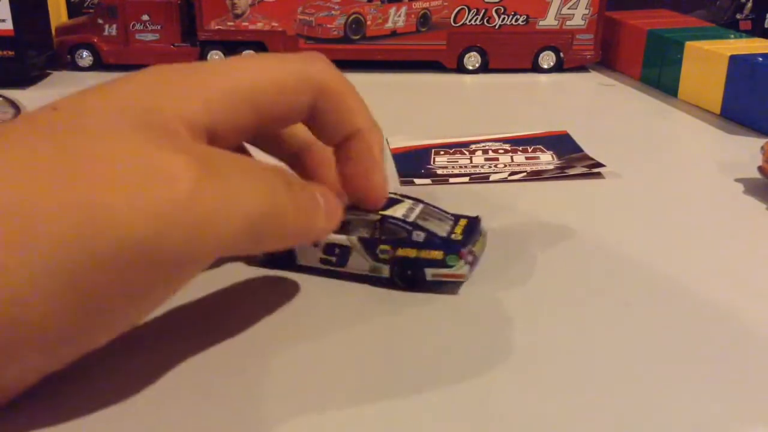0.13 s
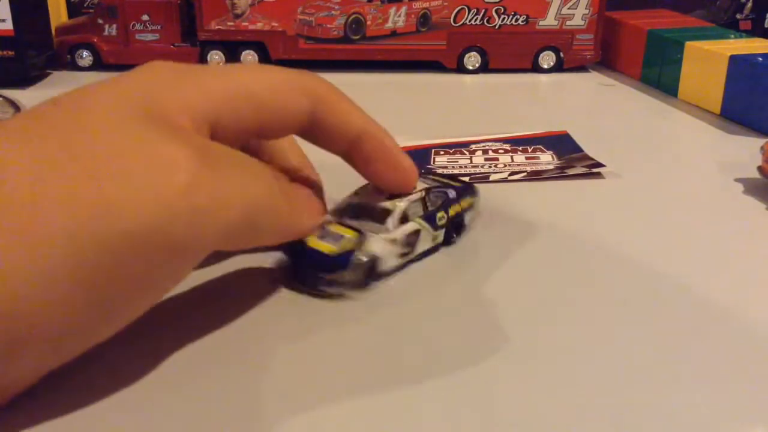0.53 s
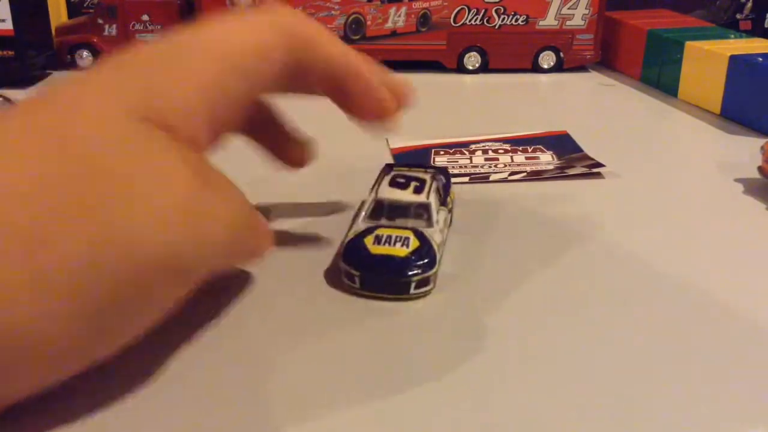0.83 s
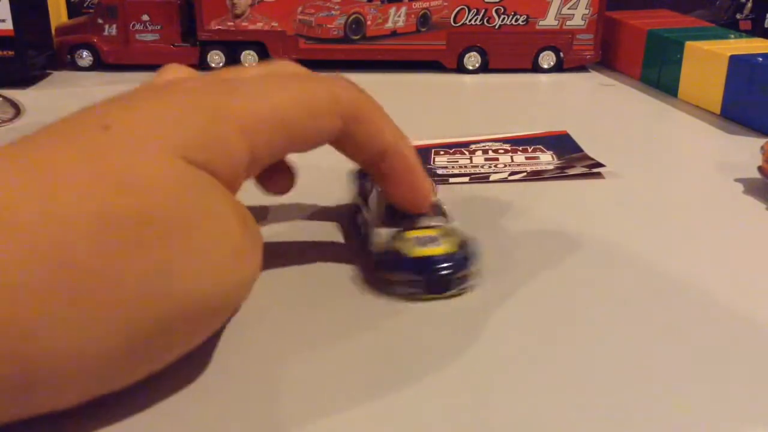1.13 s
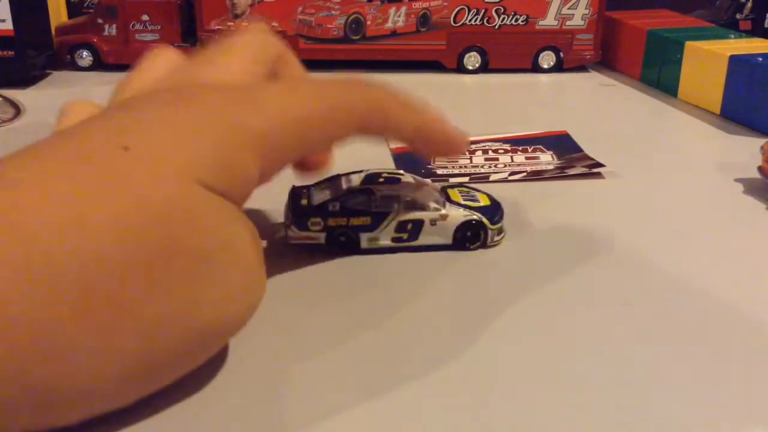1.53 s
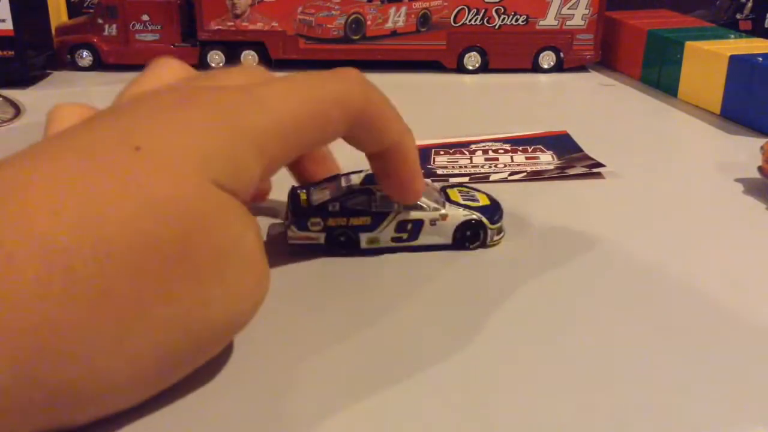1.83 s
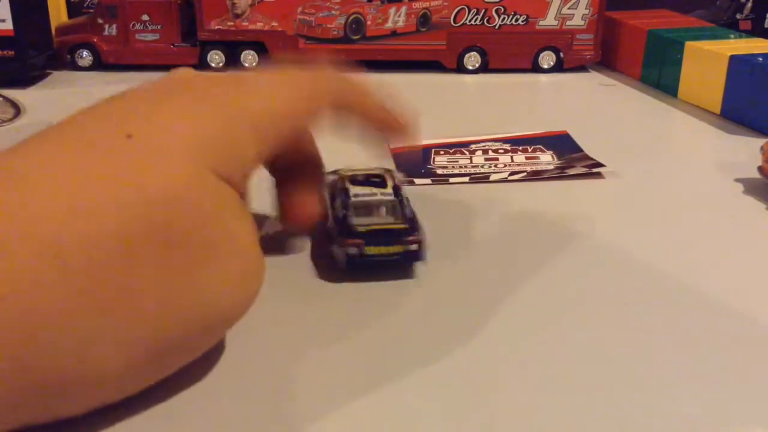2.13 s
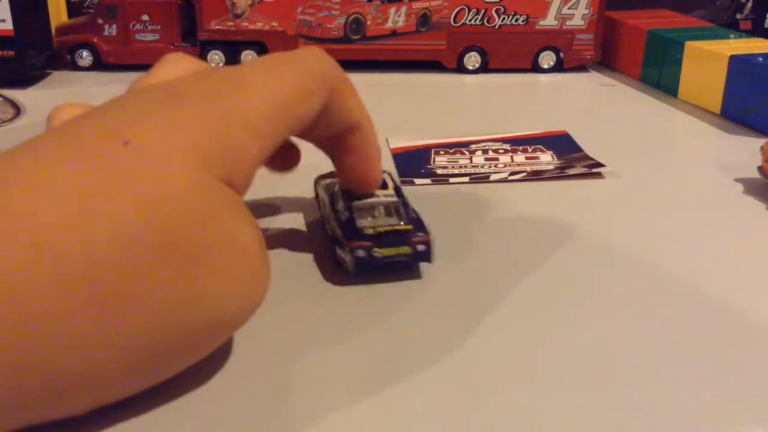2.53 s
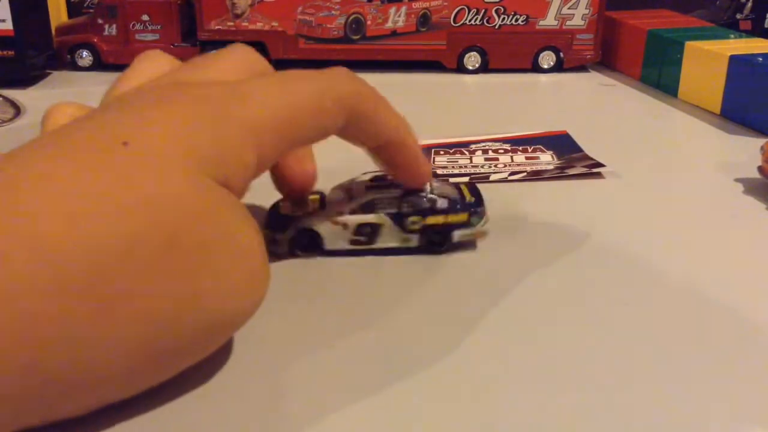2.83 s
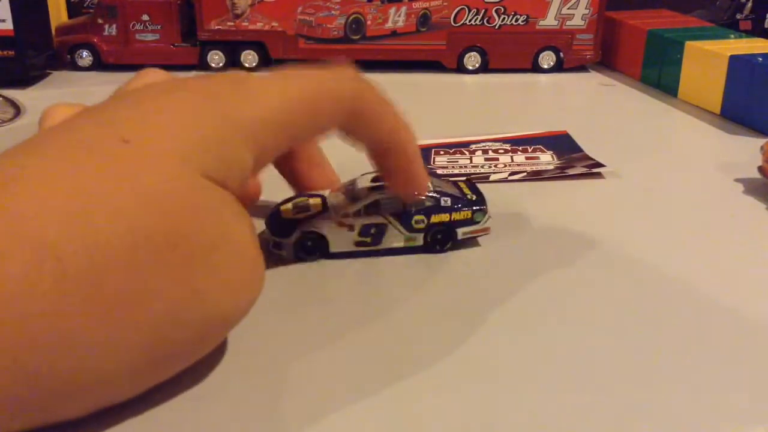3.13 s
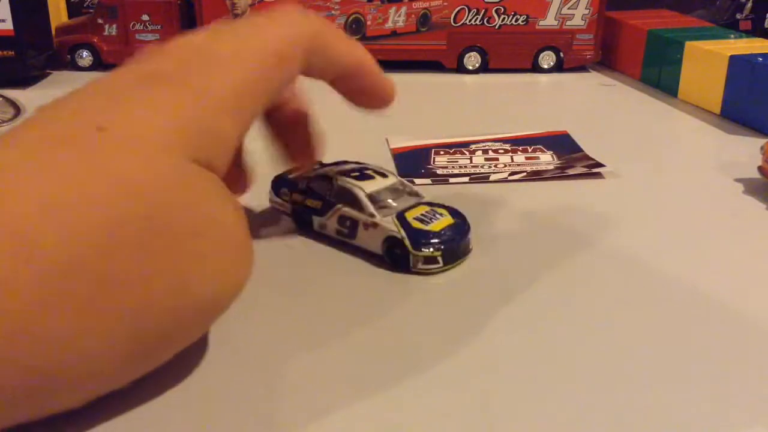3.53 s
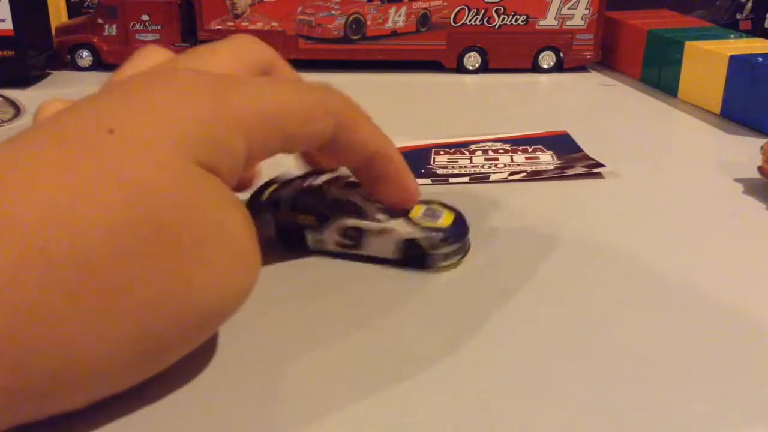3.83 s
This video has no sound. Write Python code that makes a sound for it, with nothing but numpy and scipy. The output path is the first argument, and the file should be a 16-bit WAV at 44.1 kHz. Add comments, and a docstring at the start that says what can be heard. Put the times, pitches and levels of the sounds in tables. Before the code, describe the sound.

A small die-cast toy car is turned by hand on a hollow tabletop, its hard wheels skidding in six short scrapes with ticks and dull knocks, close to the microphone in a quiet, faintly humming room.

```python
"""On a hollow plastic tabletop in a quiet room, a finger turns a small die-cast toy car in six short drags.
Thousands of tiny random contacts make the skid of the hard wheels, its crackling treble and its rings.
Axles and body tick as short noise bursts that shake the car; some wheels briefly sing in a narrow band.
The tabletop booms and knocks through its own resonances, the hand thuds as low damped swings.
The car has a short echo, and steady coloured noise is the hum of the room."""
import sys
import numpy as np
from scipy import signal
from scipy.io import wavfile

SR = 44100
rng = np.random.default_rng(int(sys.argv[2]) if len(sys.argv) > 2 else 0)


def wav_out(sig):
    """Save sig, one row per channel (or a flat mono array), as 16-bit PCM at SR to the path in sys.argv[1]."""
    wavfile.write(sys.argv[1], SR, np.round(np.clip(np.atleast_2d(sig).T, -1, 1) * 32767).astype(np.int16))


def level_to_linear(level):
    """Convert decibel levels to linear amplitude factors, elementwise."""
    exponent = np.asarray(level, float) / 20
    return 10 ** exponent


N = 176400  # samples: 4 s
GRAINS_PER_S, GRAIN_SPREAD_DB, PATCHY_DB = 2500, 1, 2.5
LOW_CUT_HZ = 165  # the tabletop's boom and knocks lose what lies below


def rms_one(x):
    """Scale to an rms (average strength) of 1."""
    return x / np.sqrt(np.mean(x ** 2) + 1e-20)


def drift(rate_hz):
    """A smoothly wandering random curve with rms 1; a higher rate wanders faster."""
    r = np.exp(-2 * np.pi * rate_hz / SR)
    wander = signal.lfilter([1], [1, -2 * r, r * r], rng.standard_normal(N + SR))
    return rms_one(wander[SR:])  # the first second lets the filter settle


def ring(x, hz, t60):
    """A resonance: a unit click sets a sine of height 1 ringing, which falls 60 dB in t60 seconds."""
    r, w = level_to_linear(-60 / (t60 * SR)), 2 * np.pi * hz / SR
    return signal.lfilter([0, np.sin(w)], [1, -2 * r * np.cos(w), r * r], x + 1e-18)


def width_to_t60(width_hz):
    """A narrower resonance rings longer."""
    return np.log(1000) / (np.pi * width_hz)


def high_pass(x, hz):
    """Removes what lies below hz."""
    return signal.sosfilt(signal.butter(4, hz, "high", fs=SR, output="sos"), x)


def colour(x, spectrum, patchy_db):
    """Splits x into bands of about a third octave, each with its own level and slow flicker; rms 1."""
    hz, db = np.transpose(spectrum)
    edges = np.geomspace(hz[0], hz[-1], int(3 * np.log2(hz[-1] / hz[0])) + 2)
    out = 0
    for k, (low, high) in enumerate(zip(edges, edges[1:])):
        band_pass = signal.butter(2, [low, high], "band", fs=SR, output="sos")
        band = signal.sosfilt(band_pass, x[k % 2])  # neighbouring bands take turns with the two inputs
        level_db = np.interp(np.log(low * high) / 2, np.log(hz), db)
        if patchy_db:
            level_db = level_db + patchy_db * drift(5.9)
        out = out + band * level_to_linear(level_db)
    return rms_one(out)


def grains(per_s):
    """Random tiny contacts of uneven size: two trains with the same moments, each with its own signs."""
    sizes = level_to_linear(GRAIN_SPREAD_DB * np.minimum(rng.exponential(1, N), 4))
    sizes = sizes * (rng.random(N) < per_s / SR)
    return sizes * rng.choice([-1, 1], (2, N))


# tone of the skidding wheels: (frequency [Hz], relative level per Hz [dB])
SKID_TONE = [(260, -39), (450, 5), (492, -6), (841, 0.5), (973, -6), (1100, -1.5), (1740, 1.5), (3010, 2.5),
             (3320, -4), (3680, 8), (6500, -11), (8450, -15.5), (14300, -120)]


def skid(contact):
    """Hard wheels skid over the table's grain: the contacts take on the skid's tone."""
    return colour(contact, SKID_TONE, PATCHY_DB)


def wheel_rings(contact, rings):
    """The contacts also set a few resonances of the wheels ringing."""
    out = 0
    for hz, width_hz, ring_db in rings:
        out = out + level_to_linear(ring_db) * rms_one(ring(contact[0], hz, width_to_t60(width_hz)))
    return out


# tone of the skid's treble: (frequency [Hz], relative level per Hz [dB])
TREBLE_TONE = [(3240, -69), (5500, 2), (7010, 0.5), (8200, -4.5), (11300, -12.5), (14400, -8.5),
               (15500, -17)]


def treble(contact):
    """The contacts and a sparser crackle, whose rate rises and falls in clumps, make the treble."""
    crackle_per_s, clump_db, crackle_db = 370, 9, 3
    crackle = rms_one(grains(crackle_per_s * level_to_linear(clump_db * drift(61))))
    return colour(rms_one(contact) + level_to_linear(crackle_db) * crackle, TREBLE_TONE, PATCHY_DB)


def slips():
    """The wheels catch and let go: a gain of rms 1 that leaps in short bursts at random moments."""
    slips_per_s, slip_s, slip_db = 70, .0012, 6
    t = np.arange(1024) / SR
    leap = t / slip_s * np.exp(1 - t / slip_s)
    starts = (rng.random(N) < slips_per_s / SR) * rng.random(N)
    return rms_one(1 + level_to_linear(slip_db) * signal.fftconvolve(starts, leap)[:N])


# resonances of the tabletop, also used by knocks():
# (frequency [Hz], relative level [dB], time to fall 60 dB [s])
TABLE_MODES = [(142, -24.5, 0.16), (193, 0, 0.081), (238.5, 0.5, 0.065), (270, -0.5, 0.13),
               (303, -1.5, 0.073), (334.7, -4.5, 0.12), (425, -29.5, 0.26), (536.5, -17.5, 0.064),
               (704, -30.5, 0.12)]


def table_boom():
    """Uneven bumps, quickly wavering in strength, set the hollow tabletop's resonances ringing; rms 1."""
    bumps_per_s, judder_db, judder_hz = 600, 2, 66
    bumps = grains(bumps_per_s)[0] * level_to_linear(judder_db * drift(judder_hz))
    out = 0
    for k, (hz, db, t60) in enumerate(TABLE_MODES):
        out = out + level_to_linear(db) * ring(bumps, hz, t60) * (-1) ** k  # every other one upside down
    return rms_one(out)


# curves of each drag, levels before the low cuts:
# (time [s], skid level [dB], boom level over skid [dB], treble level over skid [dB])
DRAG_CURVES = [
    [(0.174, -78, 29.5, -7), (0.214, -45.5, 2.5, -6.5), (0.29, -55, 14, -12), (0.352, -55, 22.5, -16),
     (0.362, -43.5, -12, 5), (0.4, -41, 8.5, -15), (0.55, -49.5, 7.5, -6), (0.6, -40, 3, -5),
     (0.685, -54, 11, -3), (0.71, -65, 3, -8)],
    [(1.05, -60.5, -9, 12), (1.094, -62, 14, -25), (1.106, -40, 1, -1), (1.118, -48.5, 10.5, -5),
     (1.258, -44, 1, -9.5), (1.342, -50, 7.5, -11), (1.38, -43, -0.5, -6), (1.454, -53, 12.5, -6),
     (1.502, -55.5, 10.5, 1), (1.545, -76, 21, -13)],
    [(1.895, -55, 3, -19), (1.908, -52.5, 3, -16), (1.942, -43.5, 5.5, -3.5), (2.09, -43, 3.5, -7),
     (2.11, -47.5, 8, -9), (2.136, -47.5, 0, -13), (2.21, -56, 14, -5.5), (2.252, -68, -1, -17),
     (2.282, -69, 1, -22), (2.37, -69, 17.5, -8)],
    [(2.542, -66, 2, -21), (2.602, -59.5, 12.5, -14), (2.628, -58.5, 10, -21), (2.645, -49.5, 5, -11.5),
     (2.79, -43, 3.5, -5), (2.826, -45, 10.5, -10), (2.84, -40.5, 0.5, -14), (2.924, -57, 12, -29),
     (2.98, -91, 23, -6)],
    [(3.16, -69, 14, -3), (3.174, -67, 10, -11), (3.234, -49.5, 4, -7), (3.246, -47.5, 0.5, -15),
     (3.278, -42.5, 7.5, -5), (3.314, -41, 5.5, -8), (3.324, -40.5, 3, -7.5), (3.428, -41.5, 1, -8),
     (3.522, -56.5, 8.5, -9), (3.6, -80, 10, -8)],
    [(3.71, -82, 3, 2), (3.726, -71, 9, -22.5), (3.742, -53, 1, -4.5), (3.764, -48.5, 6.5, -7.5),
     (3.818, -65, 17, -2), (3.84, -51.5, 10, -11), (3.886, -35.5, 9, -4), (3.964, -36, 11, 2.5),
     (3.99, -39, 11.5, -6), (4.0, -42, 9, -13)],
]
# wheel resonances that stand out in each drag: (frequency [Hz], width [Hz], level over skid [dB])
DRAG_RINGS = [
    [(2820, 130, -10.5), (1350, 210, -8)],
    [(5240, 89, -34), (1490, 230, -4)],
    [(4790, 85, -11.5), (3000, 250, -11.5)],
    [(2700, 870, -12)],
    [(2870, 240, -9)],
    [(2970, 100, -10.5), (1560, 60, -9.5)],
]


def drags():
    """Skid, wheel rings, slipping treble and table boom swell and fade along each drag's curves."""
    t, contact = np.arange(N) / SR, grains(GRAINS_PER_S)
    skid_sound, boom = skid(contact), table_boom()
    slipping_treble = slips() * treble(contact)
    car, table = 0, 0
    for curve, rings in zip(DRAG_CURVES, DRAG_RINGS):
        s, db, boom_db, treble_db = np.transpose(curve)
        fade = np.clip(np.minimum(t - s[0], s[-1] + .01 - t) / .01, 0, 1)  # 10 ms at both ends
        level = level_to_linear(np.interp(t, s, db)) * fade
        bright = level_to_linear(np.interp(t, s, treble_db)) * slipping_treble
        car = car + level * (wheel_rings(contact, rings) + skid_sound + bright)
        table = table + level * level_to_linear(np.interp(t, s, boom_db)) * boom
    return car, table


# resonances of the car body: (frequency [Hz], relative level [dB], time to fall 60 dB [s])
CAR_MODES = [(1500, -6, .008), (2200, -4, .007), (2720, -3, .007), (3650, 0, .007), (4300, -3, .006),
             (5200, 0, .006), (6300, -3, .005), (7600, -4, .004), (9300, -6, .004), (11000, -6, .004),
             (13000, -8, .004)]
# ticks of axles and body:
# (time [s], peak level before the low cut and notch [dB], treble limit [Hz], burst decay time [s])
TICK_EVENTS = [(0.1555, -47, 1500, 0.0038), (0.2077, -33.5, 3550, 0.0036), (0.2423, -37, 2700, 0.0026),
               (0.3309, -27, 5280, 0.0023), (0.3564, -28, 2750, 0.0095), (0.376, -37, 4000, 0.0028),
               (0.3872, -30, 1520, 0.0038), (0.4037, -21, 1540, 0.0012), (0.5666, -31, 2170, 0.0063),
               (0.999, -46, 4270, 0.0062), (1.0266, -36.5, 7200, 0.0019), (1.0485, -43, 2760, 0.0014),
               (1.1705, -29, 3850, 0.007), (1.261, -30.5, 1550, 0.0052), (1.3564, -27, 4850, 0.0032),
               (1.3874, -33, 4940, 0.0043), (1.397, -31, 6000, 0.0024), (1.407, -39, 9000, 0.0023),
               (1.4173, -30.5, 5090, 0.0038), (1.456, -36, 4740, 0.007), (1.469, -35.5, 5000, 0.0026),
               (1.479, -35, 9000, 0.0032), (1.505, -34.5, 5210, 0.0058), (1.904, -40, 5140, 0.0063),
               (1.946, -27.5, 5070, 0.0088), (1.986, -28.5, 3000, 0.0031), (2.0998, -23, 6000, 0.0019),
               (2.2758, -41.5, 400, 0.0024), (2.5386, -45, 3000, 0.0027), (2.5541, -45, 2300, 0.0036),
               (2.6339, -30.5, 3560, 0.0023), (2.654, -32, 2990, 0.01), (2.687, -27.5, 3100, 0.0074),
               (2.711, -31, 4500, 0.0055), (2.753, -31, 4800, 0.002), (2.7684, -27.5, 2440, 0.0042),
               (2.7926, -30.5, 3530, 0.0046), (2.9058, -40.5, 3820, 0.0018), (3.2131, -37, 2200, 0.0037),
               (3.2301, -32, 2790, 0.0024), (3.275, -34, 3000, 0.0047), (3.7415, -37, 1600, 0.0025),
               (3.7663, -38, 1930, 0.0041), (3.856, -42, 2890, 0.004), (3.8886, -28, 3700, 0.013),
               (3.9047, -25, 5180, 0.0071), (3.919, -26, 4940, 0.0029), (3.944, -33, 6350, 0.0037),
               (3.9556, -22.5, 2910, 0.0047)]


def ticks():
    """Each tick is a short dying burst that cracks and shakes the car's resonances, unevenly each time."""
    spread_db, crack_db, rise_s = 2.5, 4, 0.00033
    out, t = np.zeros(N + SR), np.arange(2048) / SR
    for s, db, bright_hz, burst_s in TICK_EVENTS:
        burst = rng.standard_normal(len(t)) * np.exp(-t / burst_s)
        burst = np.diff(burst * (1 - np.exp(-t / rise_s)), prepend=0)  # differences brighten it
        shake = 0
        for hz, mode_db, t60 in CAR_MODES:
            strength = level_to_linear(mode_db + spread_db * rng.standard_normal())
            shake = shake + rms_one(ring(burst, hz, t60)) * strength
        tick = rms_one(shake) + level_to_linear(crack_db) * rms_one(burst)
        tick = signal.lfilter(*signal.butter(1, bright_hz, fs=SR), tick)
        out[int(s * SR):][:len(t)] += level_to_linear(db) * tick / np.abs(tick).max()
    return out[:N]


# a slowing wheel sings in a narrow band for a while:
# (start time [s], length [s], frequency [Hz], width of each resonance [Hz], level before the swell [dB])
SING_EVENTS = [(1.34, .11, 5100, 300, -54), (2.09, .16, 4680, 250, -54), (2.22, .14, 4600, 300, -67),
               (2.19, .18, 880, 200, -61), (2.22, .12, 1700, 250, -65), (3.735, .06, 1600, 350, -53),
               (3.79, .08, 1500, 250, -58)]


def sings():
    """Fine grains pass twice through one narrow resonance, swelling and fading."""
    t, rough, out = np.arange(N) / SR, grains(GRAINS_PER_S)[0], 0
    for s, length_s, hz, width_hz, db in SING_EVENTS:
        t60 = width_to_t60(width_hz)
        tone = rms_one(ring(ring(rough, hz, t60), hz, t60))
        swell = np.sin(np.pi * np.clip((t - s) / length_s, 0, 1)).clip(0)
        out = out + level_to_linear(db) * swell * tone
    return out


# knocks into the tabletop: (time [s], peak level [dB])
KNOCK_EVENTS = [(0.159, -33.5), (0.207, -37), (0.332, -31.5), (0.404, -26.5), (0.455, -43), (0.515, -31),
                (0.566, -31), (0.609, -29), (0.671, -33), (0.957, -42), (1.105, -31.5), (1.169, -29.5),
                (1.257, -38), (1.41, -27.5), (1.453, -35.5), (1.503, -33.5), (1.947, -31.5), (2.023, -28),
                (2.101, -36), (2.275, -39), (2.54, -40), (2.581, -40.5), (2.636, -42.5), (2.691, -39.5),
                (2.742, -39), (2.792, -29), (3.228, -34.5), (3.281, -27), (3.738, -48), (3.884, -24),
                (3.94, -23)]


def knocks():
    """Soft blows ring the tabletop's resonances, with strengths that vary from knock to knock."""
    soft_hz, spread_db = 454, 3.4
    out, click = np.zeros(N + SR), np.eye(1, SR // 4)[0]
    soft = signal.lfilter(*signal.butter(2, soft_hz, fs=SR), click)
    for s, db in KNOCK_EVENTS:
        knock = 0
        for hz, mode_db, t60 in TABLE_MODES:
            knock = knock + ring(soft, hz, t60) * level_to_linear(mode_db + spread_db * rng.standard_normal())
        knock = high_pass(knock, LOW_CUT_HZ)
        out[int(s * SR):][:len(click)] += level_to_linear(db) * knock / np.abs(knock).max()
    return out[:N]


# the hand thuds deep into the table: (time [s], peak level [dB], frequency [Hz])
THUD_EVENTS = [(.075, -61, 90.5), (.33, -62, 40), (.40, -57, 35), (0.957, -62, 131), (1.10, -71, 40),
               (1.168, -64, 50), (1.95, -67, 110), (2.098, -64, 40), (2.275, -71, 110), (3.95, -66, 35)]


def thuds():
    """Each thud of the hand is one low swing, softly started and soon damped."""
    out, click = np.zeros(N + SR), np.eye(1, SR // 4)[0]
    for s, db, hz in THUD_EVENTS:
        soft = signal.lfilter(*signal.butter(2, hz, fs=SR), click)
        thud = ring(soft, hz, 7.7 / hz)
        out[int(s * SR):][:len(click)] += level_to_linear(db) * thud / np.abs(thud).max()
    return out[:N]


def echoes(x):
    """A short diffuse tail from the walls: x smeared by fading noise that starts after 4 ms."""
    echo_db, echo_t60_s = -14, .25
    t = np.arange(SR // 2) / SR
    tail = rng.standard_normal(len(t)) * level_to_linear(-60 * t / echo_t60_s) * (t > .004)
    return level_to_linear(echo_db) * signal.fftconvolve(x, tail / np.sqrt(np.sum(tail ** 2)))[:N]


# tone of the quiet room: (frequency [Hz], relative level per Hz [dB])
ROOM_TONE = [(18, -68), (30, -66), (156, -1.5), (277, 2.5), (410, -1), (479, -6.5), (709, -8), (852, -14),
             (996, -18), (2990, -19), (3230, -21), (12300, -23), (15500, -25)]


def room_hum():
    """Steady noise, strongest in the low bands, is the room's hum."""
    room_db = -57.5  # rms
    return level_to_linear(room_db) * colour(rng.standard_normal((2, N)), ROOM_TONE, patchy_db=0)


def scene():
    """Car and table close by, over the room's hum."""
    car_low_hz, notch_hz, notch_width_hz = 363, 998, 51
    car, table = drags()
    car = high_pass(car + ticks() + sings(), car_low_hz)
    # a dip where the tabletop's reflection cancels
    cancelled = signal.lfilter(*signal.iirpeak(notch_hz, notch_hz / notch_width_hz, fs=SR), car)
    car = car - cancelled
    table = high_pass(table, LOW_CUT_HZ) + knocks() + thuds()
    return (car + echoes(car) + table + room_hum())[None]


def top_cut(x):
    """Nothing passes above the cut-off."""
    return signal.sosfilt(signal.butter(12, 15700, fs=SR, output="sos"), x)


def record(dry):
    """A steep filter cuts the top: from 16 kHz up it is at least 60 dB weaker."""
    mix = signal.sosfilt(signal.cheby2(12, 60, 16000, fs=SR, output="sos"), dry)
    return top_cut(mix)


dry = scene()
out = record(dry)
wav_out(out)
```